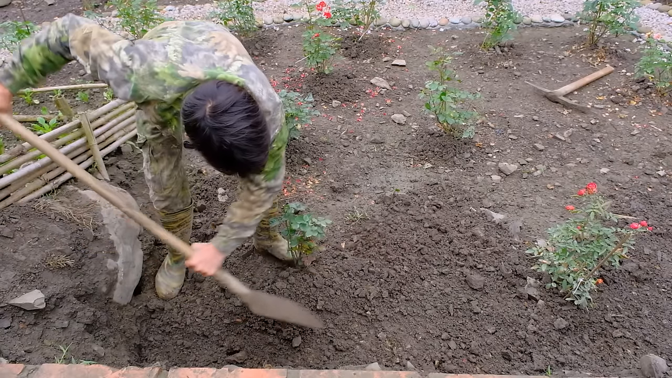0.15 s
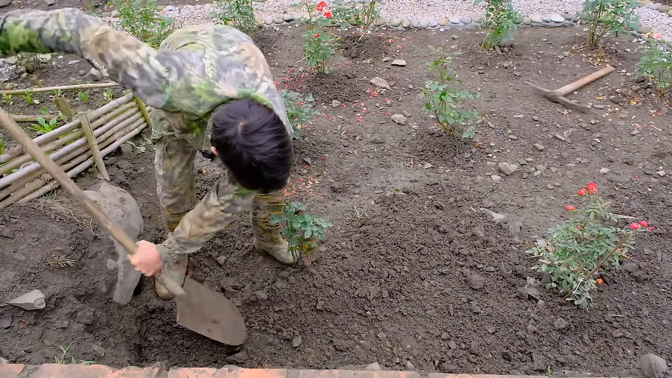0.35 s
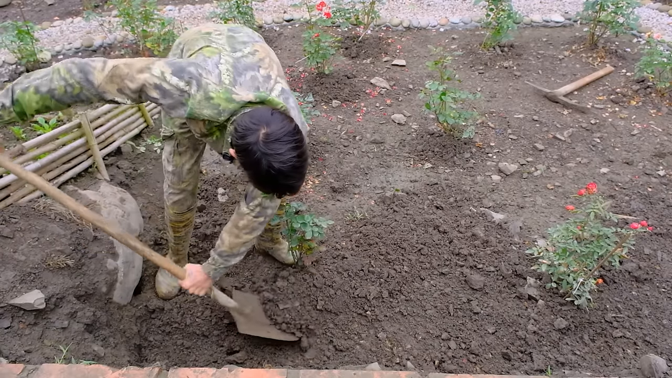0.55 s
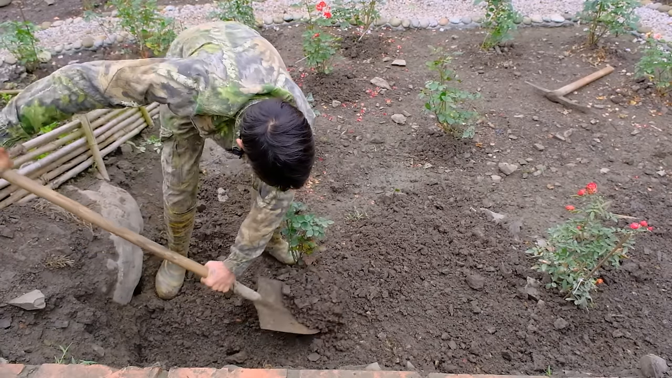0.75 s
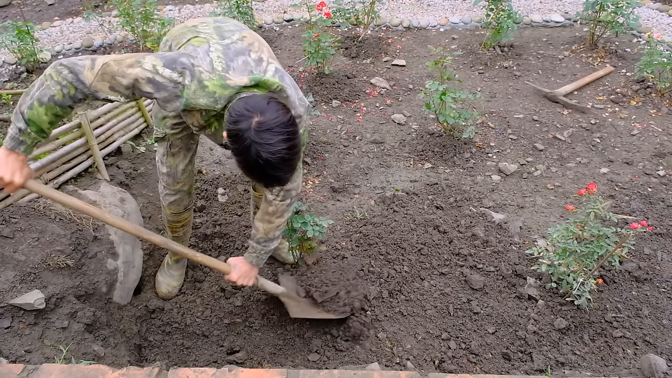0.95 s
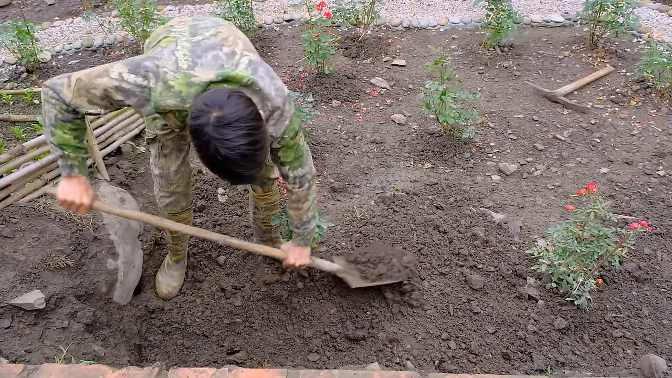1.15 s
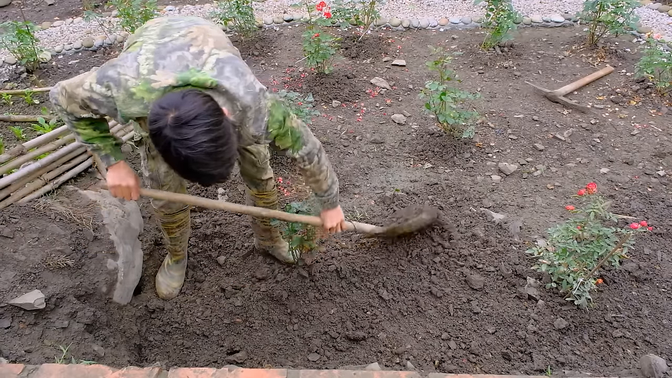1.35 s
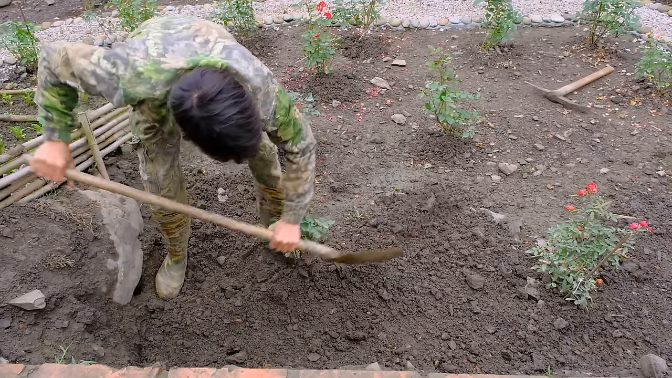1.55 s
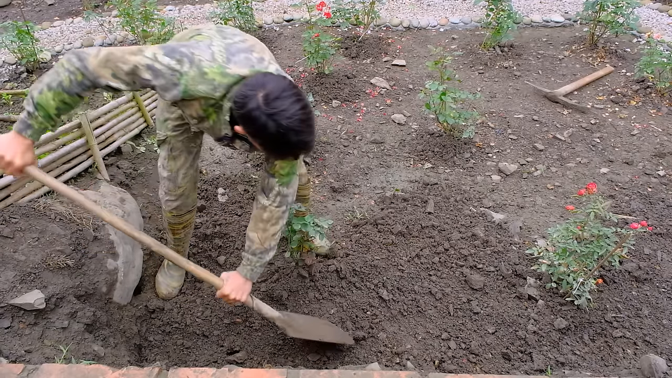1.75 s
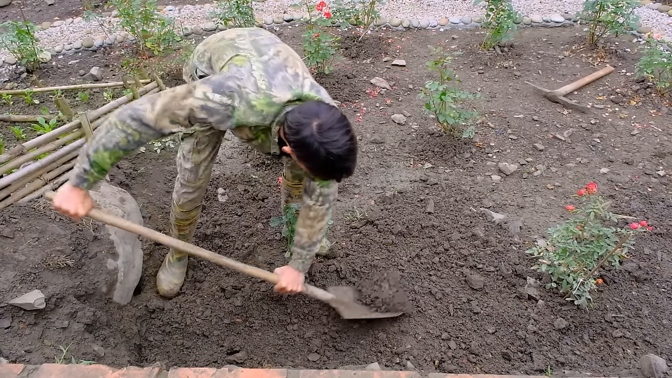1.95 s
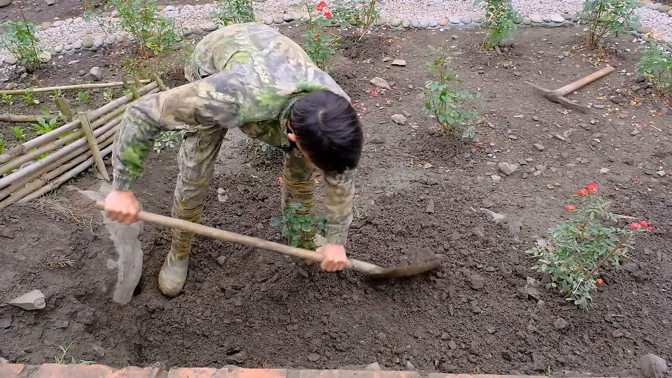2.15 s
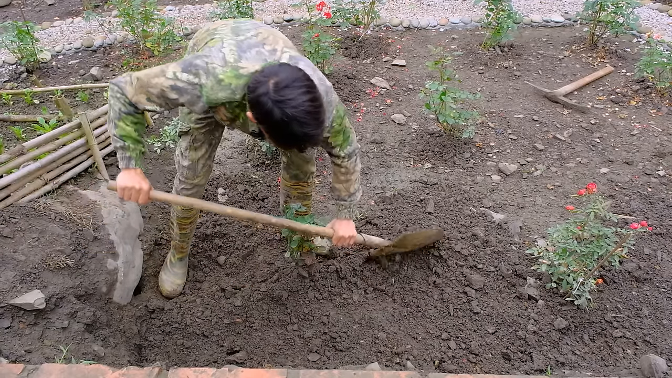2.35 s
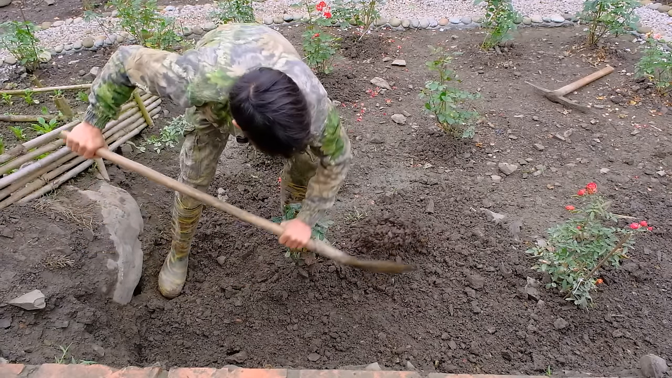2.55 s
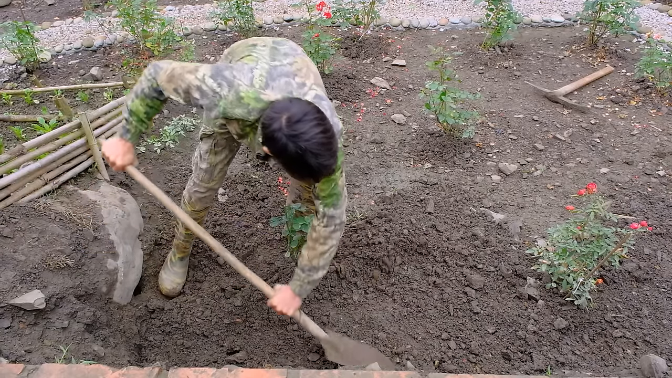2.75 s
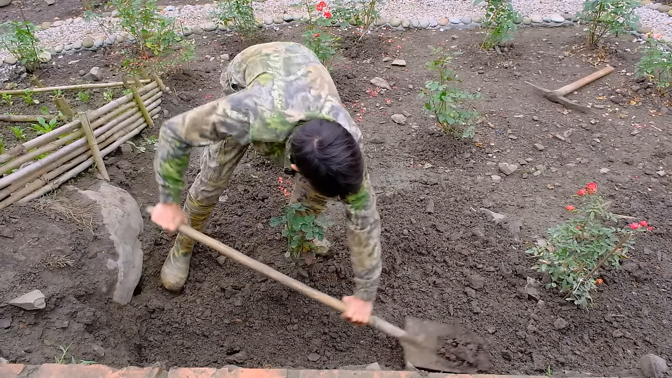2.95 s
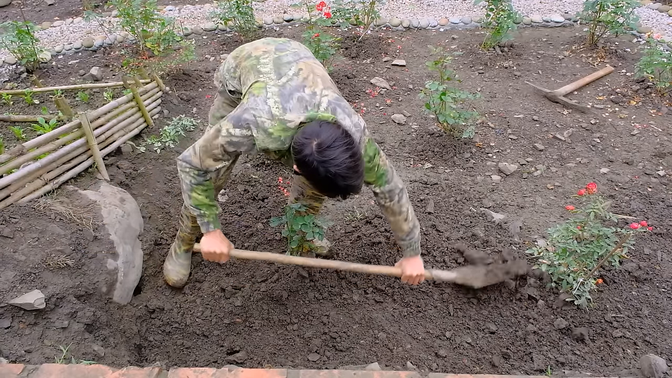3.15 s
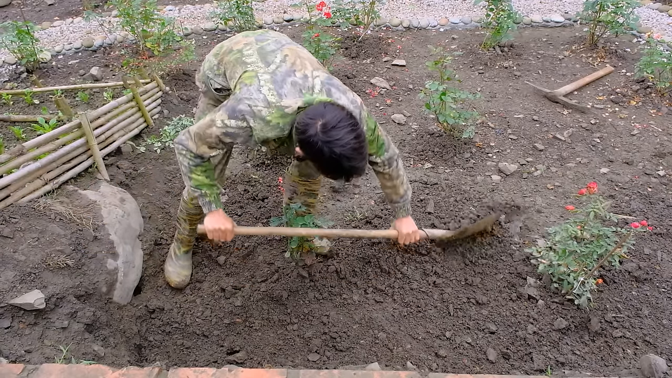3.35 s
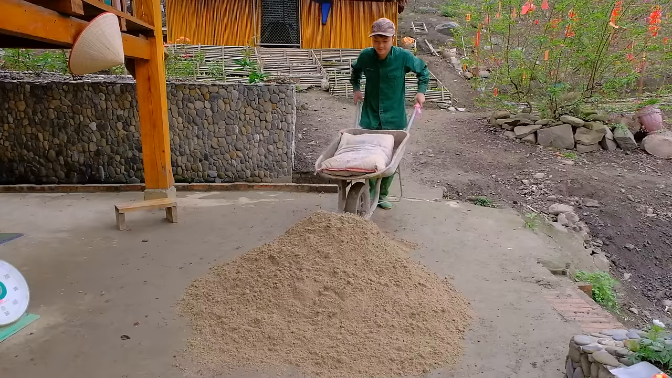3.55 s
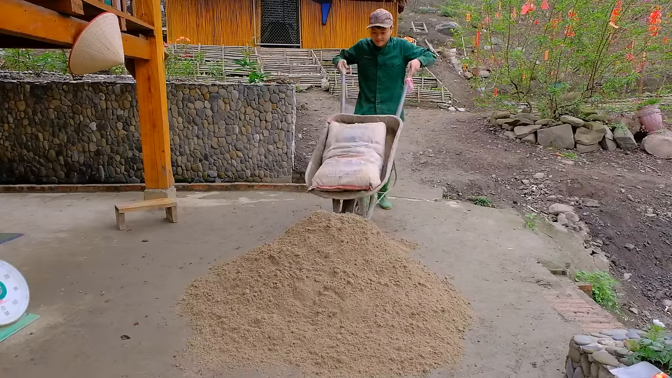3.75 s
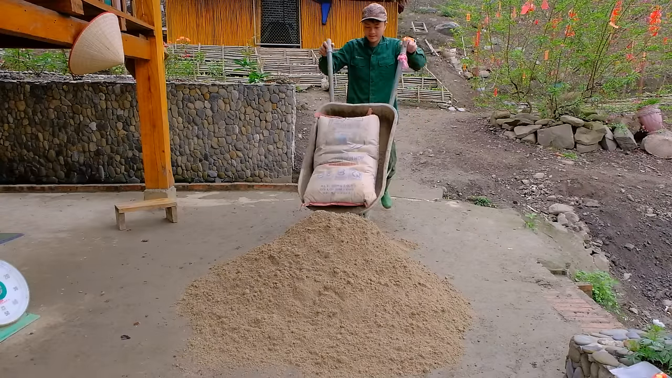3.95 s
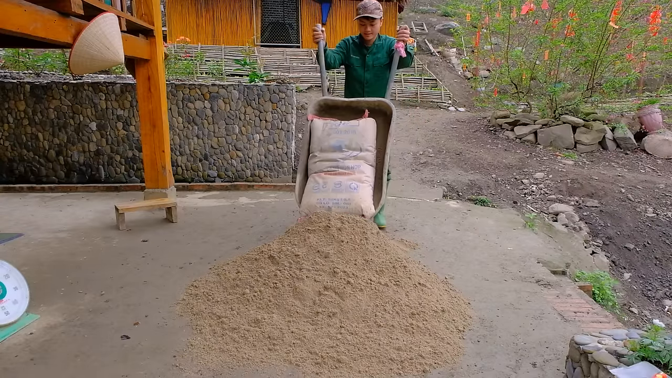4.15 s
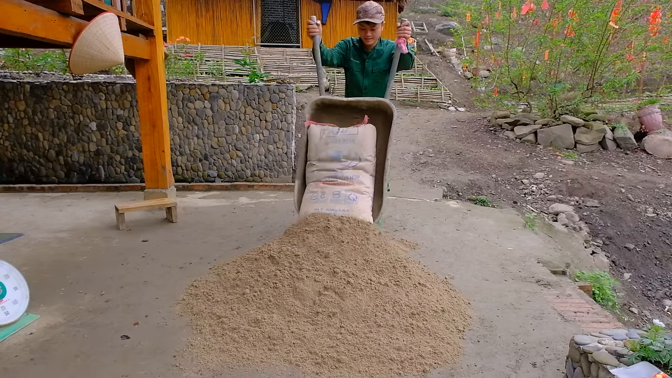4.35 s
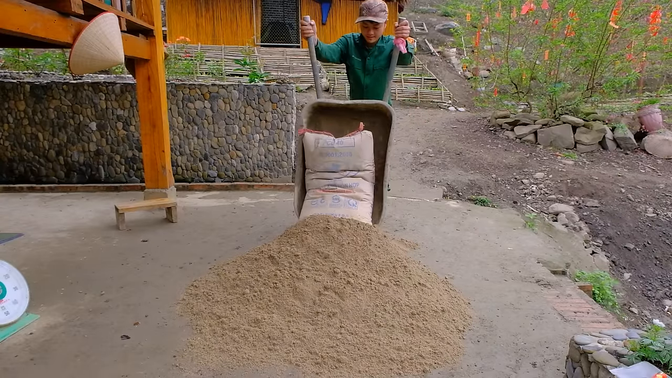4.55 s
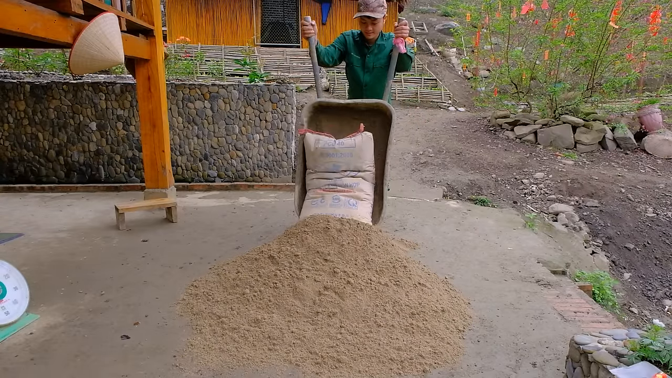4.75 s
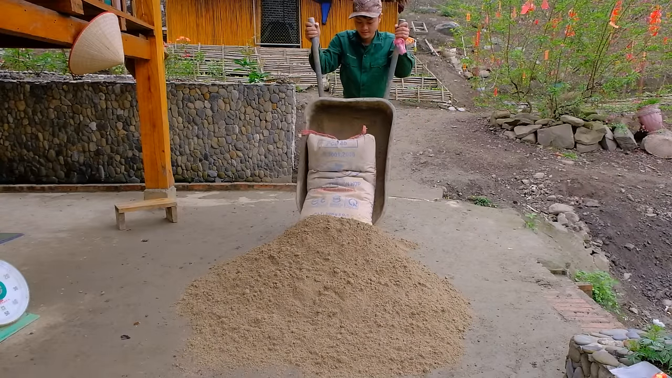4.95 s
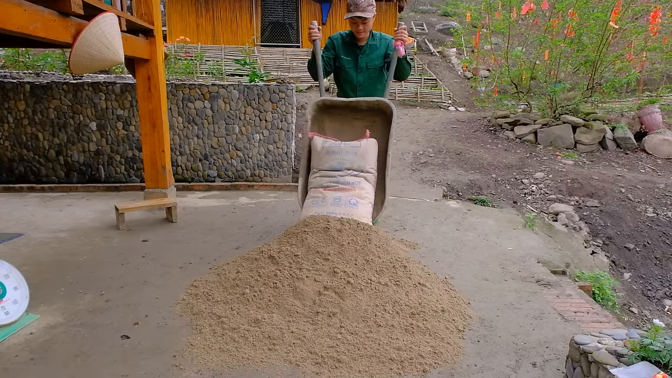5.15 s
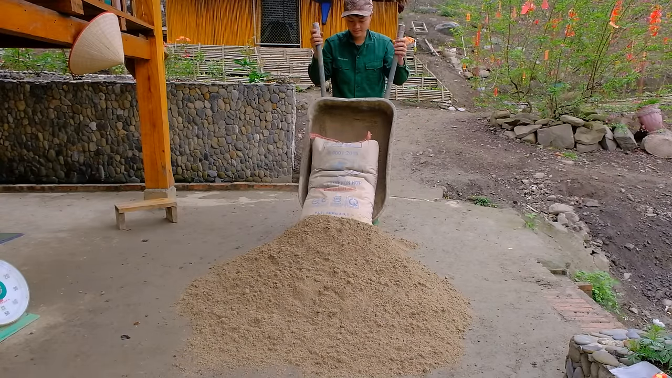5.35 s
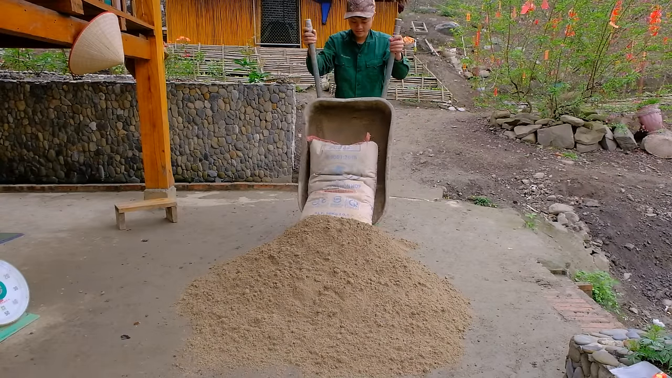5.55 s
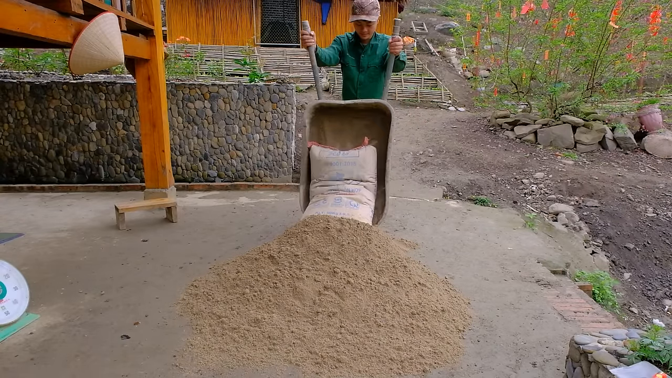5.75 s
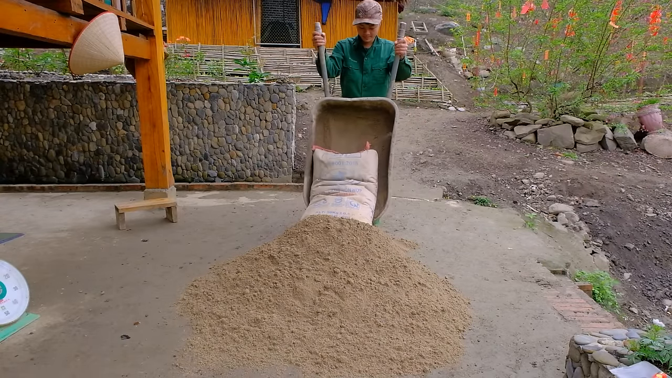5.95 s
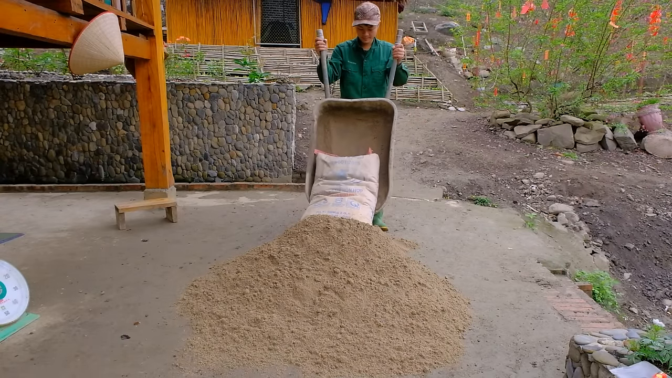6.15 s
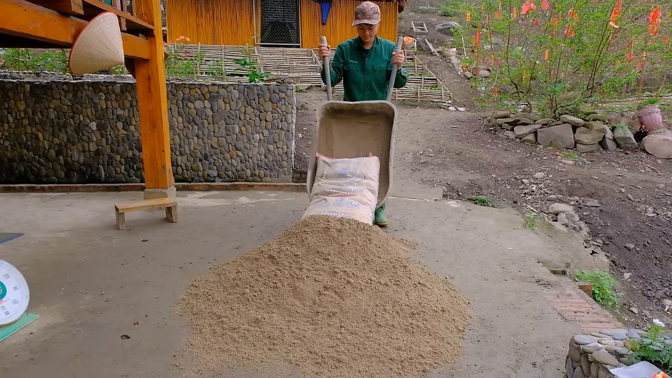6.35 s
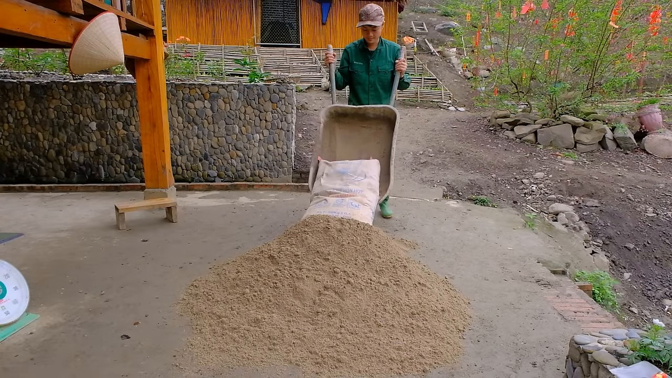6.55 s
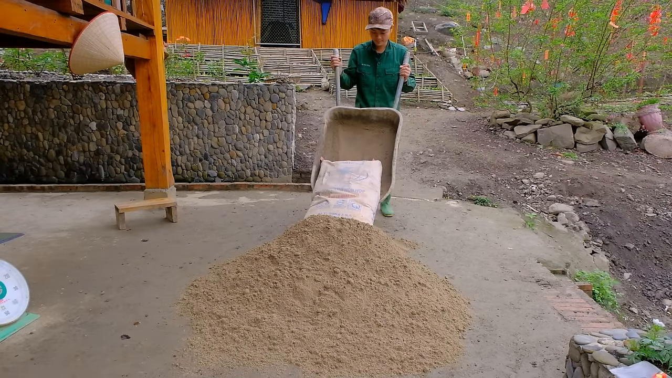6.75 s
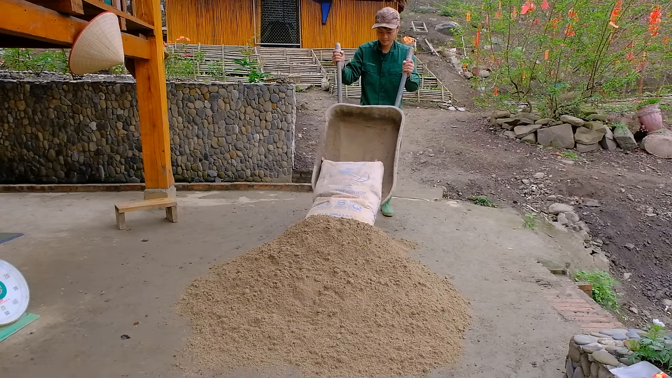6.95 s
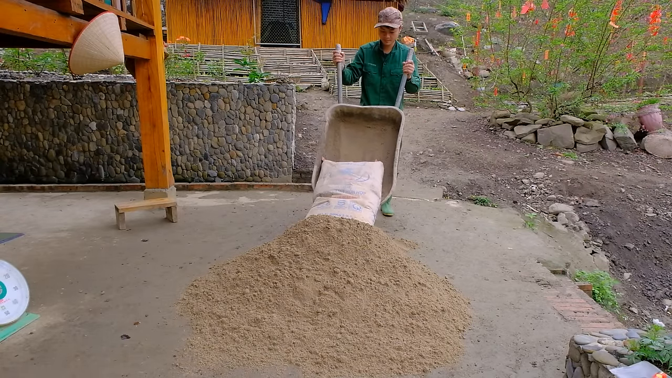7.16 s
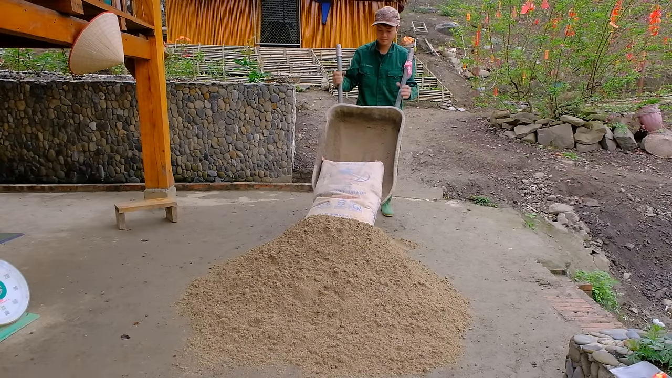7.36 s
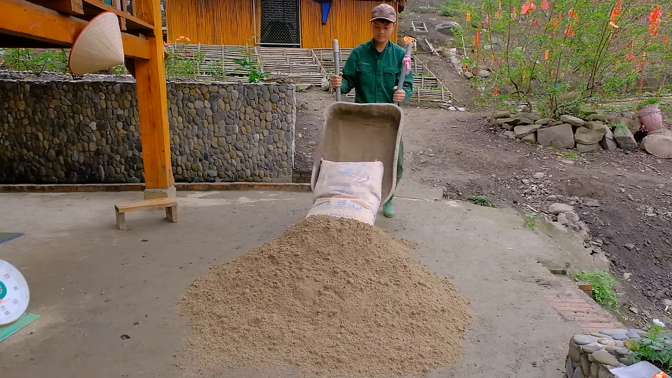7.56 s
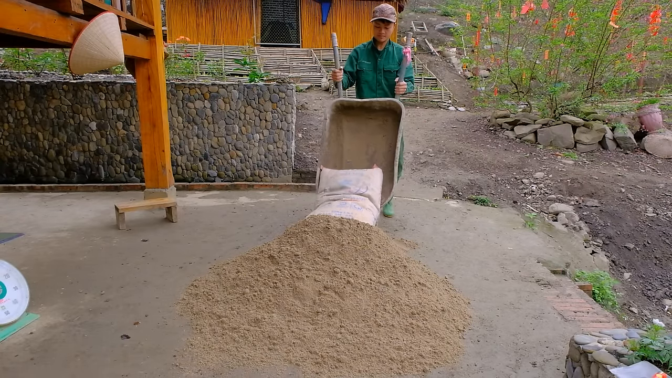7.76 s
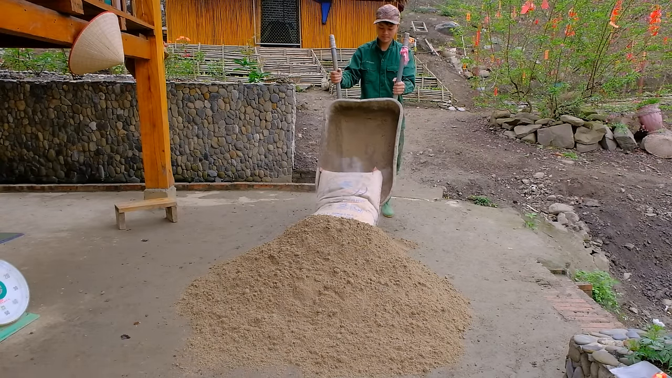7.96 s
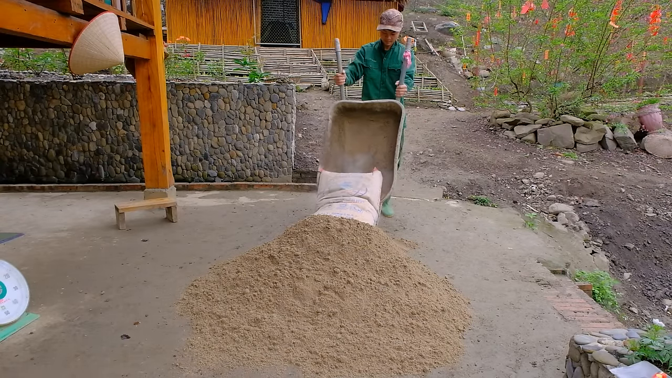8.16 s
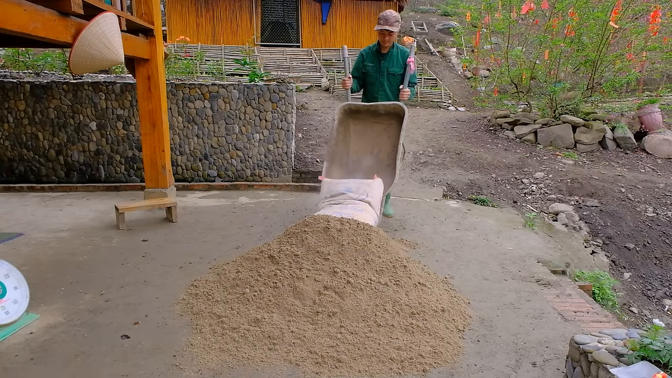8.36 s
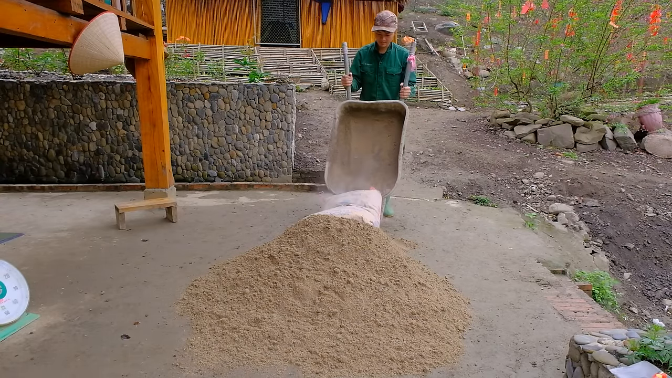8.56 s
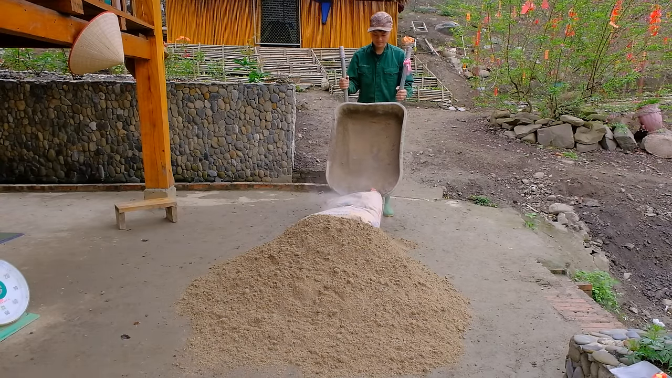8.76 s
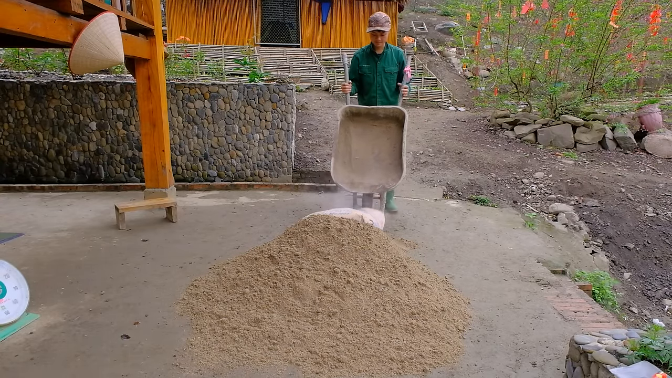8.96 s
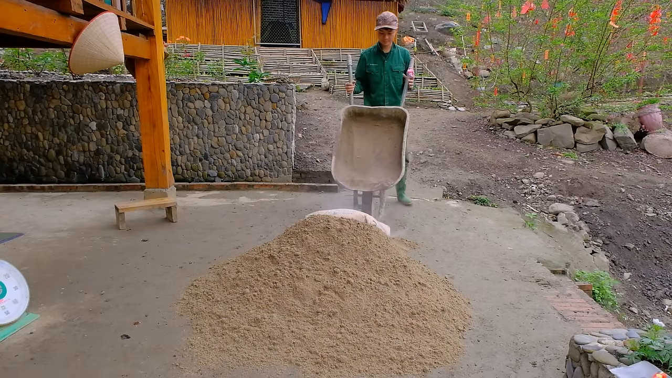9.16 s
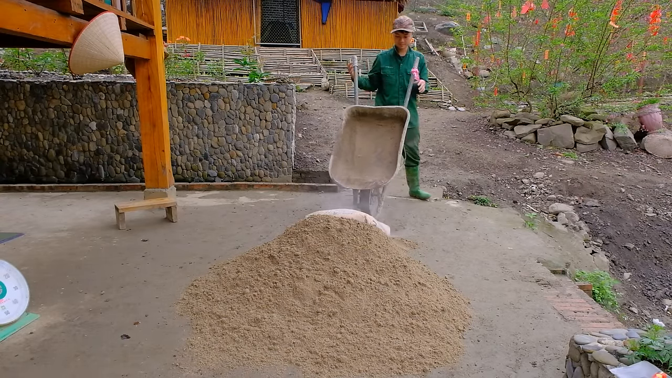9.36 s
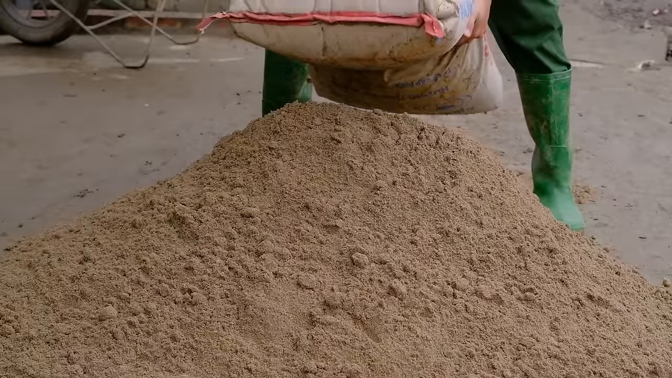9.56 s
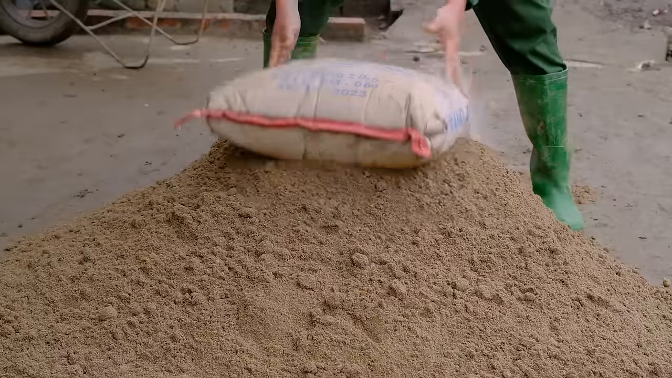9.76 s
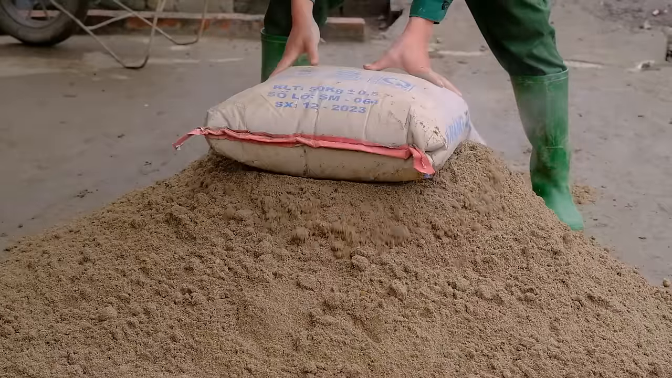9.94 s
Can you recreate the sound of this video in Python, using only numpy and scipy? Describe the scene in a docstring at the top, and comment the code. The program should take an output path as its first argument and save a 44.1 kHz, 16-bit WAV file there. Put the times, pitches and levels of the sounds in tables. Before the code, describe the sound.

Close to the microphone, a steel shovel pushes through stony garden soil with short gritty crunches, stones cracking on the ringing blade and clods crumbling. The strokes peak in a burst of loud, slightly overloaded clanks. An abrupt cut leads to a concrete yard, where a heavy sandy sack rasps in uneven jerks down a tipped metal wheelbarrow tray, booming and knocking, then lands with a soft thump. Quiet outdoor air lies beneath.

```python
"""Stony garden soil, close to the microphone: a steel shovel scrapes, stones knock its blade, the loudest peaks overload.
Then a cut to a concrete yard: a heavy sack slides in jerks down the steel tray of a tipped wheelbarrow onto a sand heap.
Soil and sand are clouds of random grains whose level follows each push or slip; the same grains ring the steel's modes.
Stones, clods and knocks are short bursts, thumps are damped low tones, and quiet outdoor air is coloured noise."""
import sys
import numpy as np
from scipy import signal
from scipy.fft import rfft, irfft
from scipy.io import wavfile
from scipy.ndimage import uniform_filter1d

SR = 44100
rng = np.random.default_rng(int(sys.argv[2]) if len(sys.argv) > 2 else 0)


def field_ratio(decibels):
    """Amplitude ratio for a level in dB (20 dB per decade); scalars and array-likes work."""
    return 10 ** (np.asarray(decibels, dtype=float) / 20)


def output_pcm(signal):
    """Save a mono or channel-first signal as 16-bit PCM at the path in sys.argv[1].

    Samples are clipped to [-1, 1] before scaling.
    """
    pcm = np.clip(np.atleast_2d(signal).T, -1, 1) * 32767
    wavfile.write(sys.argv[1], SR, np.round(pcm).astype(np.int16))


N = 441000  # samples, 10 s


# pushes of the blade through soil: [full contact t/s, length t/s, first level/dB, last level/dB,
# fine grit above the grinding level/dB]
STROKES = [(.455, 0.085, -39, -24.5, 0.5), (.65, 0.13, -29.5, -25.5, -8), (.9, 0.035, -33.5, -30.5, -6),
           (.96, 0.16, -27, -26.5, -4), (1.2, 0.066, -40.5, -24.5, -9), (1.84, 0.22, -30.5, -20.5, -1),
           (2.14, 0.092, -27.5, -31, -6), (2.29, 0.017, -28.5, -31.5, -9), (2.43, 0.029, -37, -32, -3),
           (2.804, 0.27, -27, -21, -1.5), (3.145, 0.11, -24.5, -17, -6), (3.39, 0.21, -41.5, -33, 2.5)]
# spectrum of the soil, for grinding and clods alike: [f/Hz, relative level/dB per Hz]
SOIL = [(24, -59), (40, -40), (359, -21.5), (438, -12.5), (974, -11), (1190, -9.5), (1450, -14.5),
        (2270, -17), (3220, -19), (9910, -32), (15500, -40.5)]
# ringing modes of the blade: [f/Hz, width f/Hz, level/dB]
BLADE = [(1194, 37, 7.5), (1040, 100, -7.5), (639, 72, -11), (1220, 196, -8), (1880, 240, -12),
         (3065, 65, -11.5), (3060, 340, -15), (4145, 210, -16), (4420, 130, -21.5), (5200, 66, -15)]
# clods crushed by the blade or thrown off it:
# [t/s, relative peak level/dB, treble above the body level/dB, length t/s]
CLODS = [(.449, -13, 17.5, 0.036), (.468, 1.5, 9.5, .034), (.56, -9.5, 12.5, 0.038),
         (.61, -9.5, 10.5, 0.033), (.765, -10.5, 13, 0.015), (1.025, -7.5, -8, 0.033),
         (1.262, -26, 8, 0.017), (1.735, -15.5, -8, .03), (1.868, 0, 2, 0.015), (1.886, 7.5, 3, 0.0063),
         (1.945, -10, 16.5, 0.023), (1.96, 2, 11.5, 0.023), (1.982, 7.5, 8.5, 0.015),
         (2.01, 1.5, -4, 0.027), (2.048, 8.5, -9, 0.0082), (2.085, -3.5, -17, 0.054),
         (2.43, -21.5, 13, 0.041), (2.801, -2, 9, 0.016), (2.886, -4.5, -2, 0.067), (2.976, 7, -7, 0.013),
         (3.003, 4.5, 6, 0.021), (3.056, 3.5, -11, 0.024), (3.095, 6.5, 4.5, 0.0084),
         (3.146, 12, -3, 0.013), (3.184, 13, -15, 0.0068), (3.2, 5, -5, 0.012), (3.22, -1, 8, 0.015),
         (3.244, -1.5, -12, 0.015), (3.445, -36.5, 33.5, 0.025)]


def shovel():
    """Soil grinds along the blade: the same grains give the crunch, the grit and the ring of the steel."""
    bite_db_per_s, crumble_db_per_s, grit_crumble_db_per_s = 1200, 243, 210  # rise into a push, fall after it
    trickle_db, trickle_grit_db = -46.5, -52.5  # soil that keeps trickling between pushes
    grind_db = contact(STROKES, bite_db_per_s, crumble_db_per_s, trickle_db, extra=0)
    grit_db = contact(STROKES, bite_db_per_s, grit_crumble_db_per_s, trickle_grit_db, extra=1)

    soil = grains(per_s=3000, spread_db=2.5, clump_db=3.0, clump_rate=170, bed_db=-1.5)
    low, mid, top = split(colour(soil, SOIL), 250, 3280)
    crunch = field_ratio(grind_db) * (low + mid) / np.std(mid)
    grit = field_ratio(grit_db + 3.8 * drift(56)) * rms_one(top)

    crack, tap = stones(chips_db=-6.0, thin_hz=526)
    clods, shove = blows(CLODS, SOIL, body_db=7.5, swell_share=0.09, abrupt=2.1)

    # the harder the grinding, the more the blade sings
    drive = field_ratio(24 + 1.62 * grind_db) * soil
    drive = drive + field_ratio(4.5) * tap
    # clods ring the blade more while it is pressed into the soil
    drive = drive + field_ratio(22.5 + 0.46 * grind_db) * shove
    ring = modes(drive, BLADE, wander_db=2.5, wander_rate=18)

    # bits of gravel follow the grinding; dry crumbs fall off the blade all along
    bits = field_ratio(-5 + grind_db) * gravel(230, 635, 4900)
    crumbs = field_ratio(-52) * gravel(44, 3000, 13000)
    return crunch + grit + bits + crumbs + crack + clods + ring


# stones cracking on the blade, pebbles dropping:
# [t/s, relative peak level/dB, pitch of the stone or of the struck blade f/Hz]
STONES = [(0.079, -17, 4450), (0.247, -17.5, 3000), (0.464, -1.5, 1070), (.54, -16, 1220),
          (0.663, -4, 1170), (.734, 3, 1620), (.777, -1, 1200), (.99, -1.5, 1110), (1.053, -9, 2460),
          (1.062, 1, 1810), (1.099, -12, 1210), (1.163, -11, 900), (1.181, 4, 1760), (1.188, 3.5, 1520),
          (1.218, -19, 2950), (1.236, -14, 1470), (1.255, 2, 970), (1.3, -14, 1000), (1.49, -22.5, 7000),
          (1.65, -9.5, 3730), (1.791, -21, 2700), (1.887, 5, 1170), (2.046, 4, 1200), (2.071, 7, 1180),
          (2.265, -4.5, 1820), (2.555, -43, 6000), (2.592, -19.5, 5000), (2.656, -26, 4420),
          (2.853, 19, 1240), (2.908, 1, 1230), (2.953, 1, 1200), (3.062, 21.5, 1210), (3.094, 11, 1200),
          (3.137, 10, 1040), (3.182, 20, 1190), (3.24, 2, 1250), (3.266, 6.5, 2970), (3.356, -12.5, 3670)]


def stones(chips_db, thin_hz):
    """A sharp tick, pitched by the stone or the struck blade, in a spray of chips; returns that and the tap on the steel."""
    t60_s, splinter_db = 0.011, -10.5
    ring_loss_db_per_octave = 7.5  # high-pitched blows ring the blade less
    sound, tap = np.zeros((2, N))
    age = np.arange(SR // 10) / SR
    for (s, peak_db, hz), chips in zip(STONES, rng.standard_normal((len(STONES), len(age)))):
        dying = field_ratio(peak_db - 60 * age / t60_s)
        tick = np.sin(2 * np.pi * hz * age) * field_ratio(-8 * hz * age)  # the tick loses 8 dB more in every cycle
        # chips sound around the tick's pitch, splinters everywhere
        band = np.minimum(hz * 2 ** (0.83 * np.array([-0.5, 1])), SR / 2.2)
        near = rms_one(signal.sosfilt(signal.butter(2, band, "band", fs=SR, output="sos"), chips))
        splinters = uniform_filter1d(chips, size=4)
        span = slice(round(s * SR), round(s * SR) + len(age))
        sound[span] += dying * (tick + field_ratio(chips_db) * near + field_ratio(splinter_db) * splinters)
        tap[span] += field_ratio(-ring_loss_db_per_octave * np.log2(hz / 1200)) * dying * chips
    # small stones radiate no bass
    thin = signal.butter(3, thin_hz, "high", fs=SR, output="sos")
    return signal.sosfilt(thin, sound + 1e-18), tap


# slips of the sack down the tray: [full contact t/s, length t/s, first level/dB, last level/dB,
# weight on the tray level/dB]
SLIPS = [(3.72, 0.022, -40, -29.5, 2), (3.96, .37, -23.5, -20, -3.5), (4.47, 0.054, -21.5, -16.5, 8.5),
         (4.56, 0.091, -29, -27, -14), (4.7, 0.481, -29.5, -22.5, -3), (5.24, 0.14, -20, -32.5, -4.5),
         (5.55, 0.17, -23.5, -20, 6.5), (5.78, .88, -19, -26.5, -3), (6.74, 0.039, -55, -38, 1),
         (6.84, 0.11, -37.5, -34.5, 8), (7.61, 0.095, -33, -23, 8.5), (7.79, 0.024, -15.5, -12, 4.5),
         (8.2, 0.14, -19, -17.5, -3), (8.4, 0.14, -16, -16.5, 6), (8.66, 0.29, -30.5, -26.5, 2),
         (9.07, 0.015, -24, -29, 3.5), (9.67, 0.06, -35.5, -35, -20), (9.79, 0.03, -24, -31.5, -11)]
# spectrum of the rasping sack: [f/Hz, relative level/dB per Hz]
SACK = [(24, -65), (40, -55), (101, -11.5), (179, -1), (387, 6.5), (591, 3.5), (1420, -4.5), (4570, -11),
        (6810, -17), (12400, -20.5), (15500, -25.5)]
# ringing modes of the tray: [f/Hz, width f/Hz (5 at least is played), level/dB]
TRAY = [(144, 10.7, 1.5), (189.6, 14.6, 3.5), (341.4, 6.6, 0.5), (437.5, 23, 5.5), (530.5, 14, -1.5),
        (557, 30, 6.5), (740, 23, -26), (880, 4.5, 0), (1096, 95, -16.5), (1610, 7, -3.5)]
# knocks and scuffs on the tray: [t/s, relative peak level/dB, treble above the body level/dB, length t/s]
KNOCKS = [(3.575, -41, 22.5, 0.02), (3.619, -37, 17, .006), (3.713, -16.5, 4.5, 0.014),
          (4.441, -13, 2, .027), (4.473, 6, -0.5, 0.015), (4.497, 7, -13, 0.0067), (5.37, -38, 10, .005),
          (6.725, -21.5, -10, 0.027), (6.97, -22.5, -2, 0.029), (7.585, -19, 3, 0.0058),
          (7.609, -2, -10, 0.003), (9.065, -10.5, -27, 0.059), (9.406, -31.5, 9, 0.016),
          (9.785, -11.5, -5, 0.032)]
# spectrum of a hard blow on the tray: [f/Hz, relative level/dB per Hz]
KNOCK = [(35, -55), (60, -31), (916, 0), (1330, -11), (1600, -6), (15000, -34.5)]


def barrow():
    """The sandy sack rasps over the tray, whose low modes boom under its weight."""
    grip_db_per_s, stop_db_per_s, boom_stop_db_per_s = 246, 235, 182  # rise into a slip, fall after it
    settle_db, settle_hiss_db = -47, -48.5  # sand that keeps settling between slips
    rasp_db = contact(SLIPS, grip_db_per_s, stop_db_per_s, settle_db, extra=0)
    boom_db = contact(SLIPS, grip_db_per_s, boom_stop_db_per_s, settle_db, extra=1)
    # the hiss swings less than the rasp
    hiss_db = -9 + 0.81 * contact(SLIPS, grip_db_per_s, stop_db_per_s, settle_hiss_db, extra=0)

    sand = grains(per_s=4500, spread_db=1.5, clump_db=0.68, clump_rate=12, bed_db=-4.5)
    rub = rms_one(colour(sand, SACK))
    rub_ring = rms_one(modes(sand, TRAY, wander_db=3.5, wander_rate=11))
    low, mid, top = map(rms_one, split(rub + field_ratio(-3) * rub_ring, 1030, 2910))
    slide = field_ratio(boom_db) * low + field_ratio(rasp_db) * mid + field_ratio(hiss_db) * top

    knock, push = blows(KNOCKS, KNOCK, body_db=9.5, swell_share=0.12, abrupt=1.35)
    knock_ring = modes(push, TRAY, wander_db=3.0, wander_rate=4)
    return field_ratio(-2) * slide + knock + field_ratio(-0.5) * knock_ring


# dull thumps of boots, wheel and sack on the ground: [t/s, level/dB, f/Hz, time to fall 60 dB t/s]
THUMPS = [(1.752, -14, 226, 0.031), (3.787, -22, 333, 0.054), (4.417, -6.5, 545, 0.036),
          (4.51, -14, 499, 0.24), (7.312, -29, 246, 0.063), (7.569, -24, 478, 0.1), (9.654, -32, 258, 0.11),
          (9.756, -13, 133, 0.099), (9.759, -15, 258, 0.072)]


def thumps():
    """A soft push sets one low, quickly damped resonance of the ground and load going."""
    out, age = np.zeros(N), np.arange(SR // 4) / SR
    push = 1 - np.exp(-age / 0.0012)
    for s, level_db, hz, t60 in THUMPS:
        beat = field_ratio(level_db - 60 * age / max(t60, 0.01)) * np.sin(2 * np.pi * hz * age) * push
        at = round(s * SR)
        out[at:at + len(age)] += beat[:N - at]
    return out


# spectrum of the air in the garden: [f/Hz, relative level/dB per Hz]
GARDEN_AIR = [(24, -49), (40, -11.5), (241, 13.5), (1380, 0.5), (4930, -1), (6650, -37), (9910, -11),
              (15500, -12)]
# spectrum of the air in the yard: [f/Hz, relative level/dB per Hz]
YARD_AIR = [(24, -65), (40, -4), (158, 7), (280, 15), (417, -18), (497, 4), (2990, -0.5), (15500, -77)]


def air(spectrum, level_db):
    """Quiet outdoor background: coloured noise, gently wavering."""
    waver_db = 1.5 * drift(4)
    return field_ratio(level_db + waver_db) * rms_one(colour(rng.standard_normal(N), spectrum))


def contact(rows, rise_db_per_s, fall_db_per_s, rest_db, extra):
    """Level in dB of rubbing contacts: a steep rise, a straight course, a fall, a lingering tail; powers add."""
    linger_db, linger_db_per_s = 30, 90  # this far below its end a contact dies on slowly
    t = np.arange(0, N, 40) / SR
    power = field_ratio(2 * rest_db)
    for s, length, first_db, last_db, extra_db in rows:
        end = s + max(length, 0.001)
        knee, low_db = end + linger_db / fall_db_per_s, last_db - linger_db
        db = np.interp(t, [s - 1, s, end, knee, knee + 2],
                       [first_db - rise_db_per_s, first_db, last_db, low_db, low_db - 2 * linger_db_per_s])
        power = power + field_ratio(2 * (db + extra * extra_db))
    return np.interp(np.arange(N) / SR, t, 10 * np.log10(power))


def grains(per_s, spread_db, clump_db, clump_rate, bed_db):
    """Random clicks of uneven size, in clumps, over a bed of grains too fine to count."""
    sizes = field_ratio(spread_db * np.minimum(rng.exponential(1, N), 5)) * rng.choice([-1, 1], N)
    clicks = rms_one(sizes * (rng.random(N) < per_s / SR))
    bed = field_ratio(bed_db) * rng.standard_normal(N)
    return rms_one((clicks + bed) * field_ratio(clump_db * drift(clump_rate)))


def gravel(per_s, low_hz, high_hz):
    """Sparse clicks, each ringing a few cycles at one of twelve pitches."""
    cycles = 4.7  # to fall 60 dB
    sizes = field_ratio(4 * np.minimum(rng.exponential(1, N), 4)) * (rng.random(N) < per_s / SR)
    dealt, out = rng.integers(0, 12, N), 0
    for k, hz in enumerate(np.geomspace(low_hz, high_hz, 12)):
        r, w = field_ratio(-60 * hz / (cycles * SR)), 2 * np.pi * hz / SR
        clicks = sizes * (dealt == k) + 1e-18
        out = out + signal.lfilter([1, -1], [1, -2 * r * np.cos(w), r * r], clicks)
    return rms_one(out)


def blows(events, spectrum, body_db, swell_share, abrupt):
    """Each blow is a crumbling burst, its envelope 12 dB down after its length; returns sound and push on the steel."""
    body, treble = np.zeros((2, N))
    age = np.arange(1, SR // 5) / SR
    for (s, peak_db, treble_db, length), crumbs in zip(events, rng.standard_normal((len(events), len(age)))):
        part = age / max(length, 0.001)
        rise = 1 - np.exp(-part / max(swell_share, 0.01))
        burst = crumbs * rise * field_ratio(np.maximum(peak_db - 12 * part ** abrupt, -200))
        span = slice(round(s * SR), round(s * SR) + len(age))
        for line, db in ((body, 0), (treble, treble_db)):
            line[span] += field_ratio(db) * burst[:len(line[span])]
    low, mid, _ = split(colour(body, spectrum), 444, 3500)
    top = split(colour(treble, spectrum), 300, 3200)[2]
    return field_ratio(body_db) * (low + mid + top), body


def modes(x, table, wander_db, wander_rate):
    """Parallel resonances of a steel sheet; as the contact moves, each mode is driven more or less."""
    out = 0
    for k, (hz, width_hz, db) in enumerate(table):
        r = np.exp(-np.pi * max(width_hz, 5) / SR)
        drive = (-1) ** k * field_ratio(db + wander_db * drift(wander_rate)) * x + 1e-18
        out = out + signal.lfilter([(1 - r * r) / 2, 0, (r * r - 1) / 2],
                                   [1, -2 * r * np.cos(2 * np.pi * hz / SR), r * r], drive)
    return out


def drift(rate):
    """Slow chance with spread 1: noise low-passed at the rate in Hz, drawn at every 40th sample."""
    r = np.exp(-80 * np.pi * rate / SR)
    noise = rng.standard_normal(N // 40 + 2002)
    slow = signal.lfilter([1], [1, -2 * r, r * r], noise)[2000:]  # skip the filter's start
    return np.interp(np.arange(N) / 40, np.arange(len(slow)), rms_one(slow))


def colour(x, points):
    """Causal (minimum-phase) filter with the given spectrum, built by folding its cepstrum."""
    hz, db = np.transpose(points)
    grid = np.maximum(np.fft.rfftfreq(4096, 1 / SR), 1)
    cepstrum = irfft(np.interp(np.log(grid), np.log(hz), db) * np.log(10) / 20)
    cepstrum[1:2048] *= 2
    cepstrum[2049:] = 0
    return signal.oaconvolve(x, irfft(np.exp(rfft(cepstrum))))[:len(x)]


def split(x, low_hz, high_hz):
    """Bottom, middle and top of a sound; the middle is inverted so that neighbours add at the crossings."""
    def cut(v, hz, kind):
        return signal.sosfilt(signal.butter(2, hz, kind, fs=SR, output="sos"), v)
    middle = -cut(cut(x, low_hz, "high"), high_hz, "low")
    return cut(x, low_hz, "low"), middle, cut(x, high_hz, "high")


def rms_one(x):
    """Scale to rms 1."""
    return x / np.sqrt(np.mean(x ** 2) + 1e-20)


def scene():
    """Garden first, yard after the cut; thumps run through both."""
    cut_s = 3.492
    garden = shovel() + air(GARDEN_AIR, level_db=-48)
    yard = barrow() + air(YARD_AIR, level_db=-50)
    return (np.where(np.arange(N) < cut_s * SR, garden, yard) + thumps())[None]


def band_limit(x):
    """A steep low-pass at the top of the band."""
    return signal.sosfilt(signal.butter(12, 15670, fs=SR, output="sos"), x)


def record(dry):
    """The microphone overloads: the loudest peaks are clipped flat."""
    overloaded = np.clip(dry, -1, 1)
    return band_limit(overloaded)


dry = scene()
out = record(dry)
output_pcm(out)
```